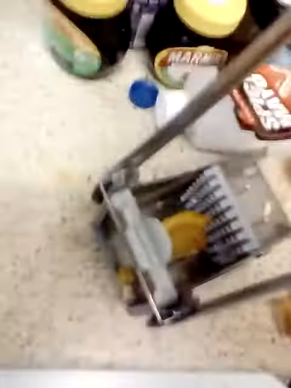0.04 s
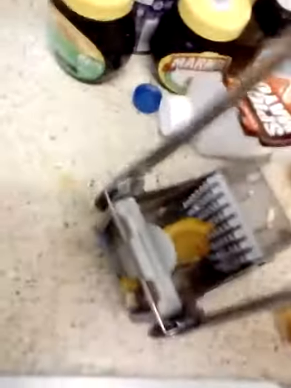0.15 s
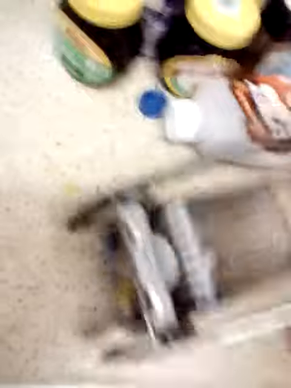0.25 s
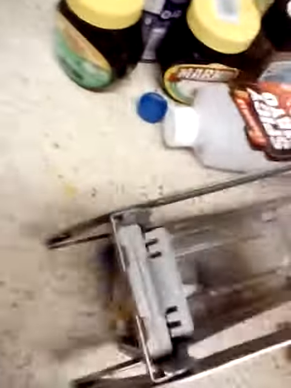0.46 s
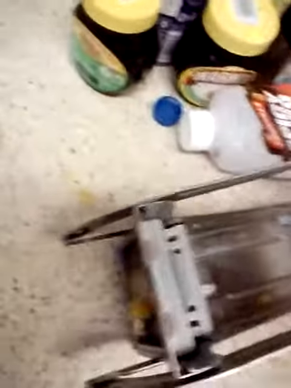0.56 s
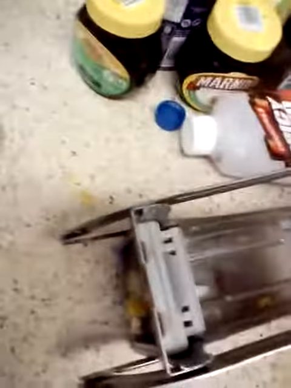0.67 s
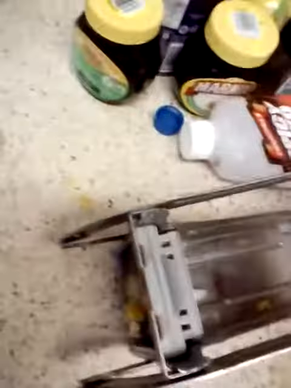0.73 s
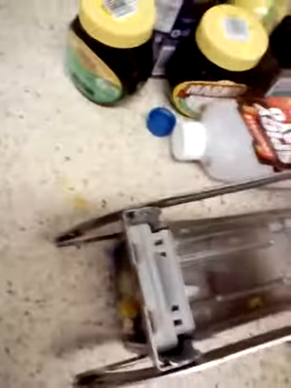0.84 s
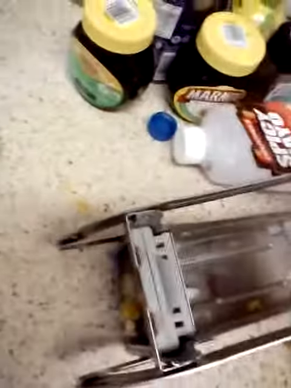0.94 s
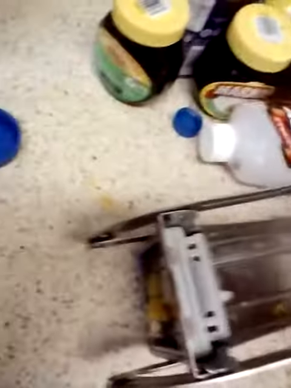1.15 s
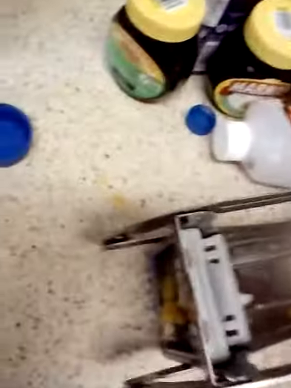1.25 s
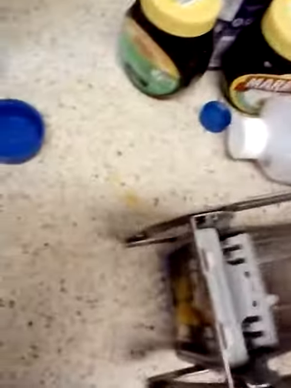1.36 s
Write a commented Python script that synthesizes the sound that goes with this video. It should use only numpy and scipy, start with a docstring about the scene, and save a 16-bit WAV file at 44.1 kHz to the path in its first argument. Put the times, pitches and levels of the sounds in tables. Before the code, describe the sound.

A lever vegetable chopper crunches through a vegetable and shuts with a sharp plastic clack.

```python
"""A lever vegetable chopper is pressed shut on a counter, close up, in a small kitchen with faint hiss.
At 0.23 s the pusher knocks the vegetable and crunches it through the blade grid; wet pulp fizzes.
The plastic parts clack, loudest at 0.42 s, and the base thumps the counter. The lever ticks lightly.
From 1.2 s the grip shifts with a faint rumble and the pusher starts to scrape back."""
import sys
import numpy as np
from scipy import signal
from scipy.fft import rfft, irfft, next_fast_len
from scipy.io import wavfile
from scipy.ndimage import map_coordinates

SR = 44100
rng = np.random.default_rng(int(sys.argv[2]) if len(sys.argv) > 2 else 0)


def output_pcm(signal):
    """Save a mono or channel-first signal as 16-bit PCM at the path in sys.argv[1].

    Samples are clipped to [-1, 1] before scaling.
    """
    pcm = np.clip(np.atleast_2d(signal).T, -1, 1) * 32767
    wavfile.write(sys.argv[1], SR, np.round(pcm).astype(np.int16))


N = 61739

# modes of the plastic body: (frequency [Hz], level [dB], t60 [s])
PLASTIC_MODES = [(760, -13, 0.064), (1202, -12.5, 0.026), (1437, -11.5, 0.046), (1499, -5, 0.02),
                 (1650, -13.5, 0.02), (2034, -11, 0.026), (2598, -7.5, 0.086), (2895, -8, 0.0344),
                 (3132, -10, 0.024), (3564, -3, 0.026), (3890, -15.5, 0.013), (5680, -13.5, 0.013)]


def amp(db):
    """Decibels to gain."""
    return 10 ** (np.asarray(db) / 20)


def unit_rms(x):
    """Scale to rms 1."""
    return x / np.sqrt(np.mean(x ** 2) + 1e-20)


def interp_log(points, hz):
    """Read (frequency [Hz], value) points on a log axis."""
    point_hz, values = np.transpose(points)
    return np.interp(np.log(hz + 1), np.log(point_hz + 1), values)


def envelope(points):
    """Gain per sample from (time [s], level [dB]); silent before the first point, last one held."""
    time_s, db = np.transpose(points)
    return amp(np.interp(np.arange(N) / SR, time_s, db, left=-120, right=db[-1]))


def colour(x, spectrum, tilt_db_oct=0, size=4096):
    """Minimum-phase filter of unit energy with the given spectrum and tilt."""
    hz = np.fft.rfftfreq(size, 1 / SR)
    gain_db = interp_log(spectrum, hz) + tilt_db_oct * np.log2(np.clip(hz, 300, 8000))
    cepstrum = irfft(np.log(amp(gain_db)))
    half = size // 2
    causal = np.r_[cepstrum[0], 2 * cepstrum[1:half], np.zeros(half)]
    kernel = irfft(np.exp(rfft(causal)))
    return signal.fftconvolve(x, kernel / np.linalg.norm(kernel))[:len(x)]


def add(track, start_s, x):
    """Mix x into the track."""
    part = track[max(round(start_s * SR), 0):][:len(x)]
    part += x[:len(part)]


def ring(modes, scatter_db, detune, tilt_db_oct=0, pivot_hz=2200):
    """Damped modes; level and pitch vary a little per blow."""
    t = np.arange(SR // 2) / SR
    out = np.zeros(len(t))
    for k, (hz, db, t60_s) in enumerate(modes):
        start_db = db + tilt_db_oct * np.log2(hz / pivot_hz) + scatter_db * rng.standard_normal()
        detuned_hz = hz * (1 + detune * rng.standard_normal())
        out += (-1) ** k * amp(start_db - 60 * t / t60_s) * np.sin(2 * np.pi * detuned_hz * t)
    return out


def grains(per_s, spread_db, smooth_db):
    """Tiny breaks or slips of uneven size over smooth rubbing noise."""
    hits = rng.random(N) < per_s / SR
    sizes = amp(spread_db * np.minimum(rng.exponential(size=N), 3))
    impulses = unit_rms(hits * sizes * rng.choice([-1, 1], N))
    return unit_rms(impulses + amp(smooth_db) * rng.standard_normal(N))


def through_body(x, body_db=-19.5):
    """Rubbing and breaking keep the plastic's modes ringing."""
    response = ring(PLASTIC_MODES, scatter_db=0.5, detune=0.001)
    return x + amp(body_db) * signal.fftconvolve(x, response / np.linalg.norm(response))[:N]


def kitchen(x, tail_db=-10.5, early_db=-10, early_t60_s=0.049, rise_s=0.0033):
    """Direct sound, early echoes off counter and jars, and the room's tail."""
    # reverberation: (frequency [Hz], t60 [s])
    decay_times = [(70, 0.393), (250, 0.51), (700, 0.46), (2000, 0.32), (5000, 0.22), (12000, 0.3)]
    hz, frame_s, noise = signal.stft(rng.standard_normal(SR * 2 // 3), SR, nperseg=256)
    decay = amp(-60 * frame_s / interp_log(decay_times, hz)[:, None])
    tail = signal.istft(noise * decay, SR, nperseg=256)[1]
    t = np.arange(len(tail)) / SR
    rise = 1 - np.exp(-(t / rise_s) ** 2)
    tail *= rise
    early = rng.standard_normal(len(t)) * rise * amp(-60 * t / early_t60_s)
    response = amp(tail_db) * tail / np.linalg.norm(tail) + amp(early_db) * early / np.linalg.norm(early)
    return x + signal.fftconvolve(x, response)[:len(x)]


def hiss(waver_db=0.7, waver_per_s=12, hum_hz=260, hum_db=-63):
    """Faint room noise and a low hum, both wavering slowly."""
    # room noise: (frequency [Hz], level [dB])
    spectrum = [(25, -24.5), (80, -13), (140, -3), (200, -7), (255, -4.5), (340, -8.5), (450, -18),
                (800, -25.5), (1300, -15.5), (2000, -8.5), (2700, -2.5), (4000, -7.5), (6300, -16.5),
                (8200, -38), (13500, -33.5), (16000, -31)]
    # room noise: (time [s], level [dB])
    levels = [(0, -50), (.12, -56), (.6, -52), (.85, -55.5), (1.0, -54.5), (1.12, -51.5), (1.23, -56),
              (1.4, -74)]
    t = np.arange(N) / SR
    waver = map_coordinates(rng.standard_normal(40), [t * waver_per_s], mode="mirror")
    drift_rad = map_coordinates(rng.standard_normal(40), [t * waver_per_s], mode="mirror")
    noise = unit_rms(colour(rng.standard_normal(2 * N), spectrum)[N:])
    hum = amp(hum_db) * np.sin(2 * np.pi * hum_hz * t + drift_rad)
    return envelope(levels) * amp(-waver_db * waver) * noise + hum


def handling():
    """The shifting grip makes the base rumble faintly."""
    # rumble: (time [s], level [dB])
    levels = [(1.12, -92), (1.21, -57.5), (1.26, -61), (1.33, -47), (1.4, -50.5)]
    # rumble: (frequency [Hz], level [dB])
    spectrum = [(25, -27.5), (90, -1), (140, 2), (300, -4.5), (420, -9.5), (700, -33.5), (3000, -47)]
    return envelope(levels) * unit_rms(colour(rng.standard_normal(N), spectrum))


def scrape():
    """The pusher sticks and slips along its channel."""
    # rubbing: (time [s], level [dB])
    levels = [(.58, -53.5), (.645, -49.5), (.69, -58.5), (.74, -62), (1.24, -65.5), (1.295, -49),
              (1.32, -33), (1.342, -34), (1.362, -40), (1.385, -34.5), (1.4, -34.5)]
    # rubbing: (frequency [Hz], level [dB])
    spectrum = [(60, -37), (150, -3.5), (400, -0.5), (700, -5.5), (1300, 7), (2000, 0.5), (3000, 5),
                (4500, -3), (6300, -11), (8000, -19.5), (14500, -32.5), (17000, -32.5)]
    slips = colour(grains(per_s=1200, spread_db=-1.5, smooth_db=-3), spectrum)
    return kitchen(through_body(envelope(levels) * slips))


def fizz():
    """Wet pulp crackles finely as it is squeezed past the plastic."""
    # crackle: (time [s], level [dB])
    levels = [(.19, -75), (.24, -43.5), (.30, -53), (.325, -78), (.365, -89), (.39, -51), (.412, -77),
              (.421, -32), (.434, -44.5), (.48, -61.5), (.495, -72.5), (.60, -78), (.645, -66.5),
              (.69, -67), (.73, -96), (1.29, -92.5), (1.318, -50), (1.4, -61)]
    # crackle: (frequency [Hz], level [dB])
    spectrum = [(1000, -36.5), (4000, -6.5), (6300, -11), (8000, -3), (11000, -10), (14000, -4),
                (16000, -4.5)]
    return envelope(levels) * colour(grains(per_s=2000, spread_db=6, smooth_db=-16.5), spectrum)


def contacts(hits, spectrum, crack_t60_s, spot_db, body_db):
    """Each contact: a short crack, a brief ring of the struck spot, the ring of the plastic body."""
    crack_db, spot_attack_s, spot_t60_s = -2.5, 0.00027, 0.014
    out, t = np.zeros(N), np.arange(SR // 2) / SR
    for time_s, db, tilt_db_oct, spot_hz in hits:
        burst = rng.standard_normal(len(t)) * amp(crack_db - 60 * t / crack_t60_s)
        crack = colour(burst, spectrum, tilt_db_oct)
        attack = 1 - np.exp(-t / spot_attack_s)
        spot = attack * amp(spot_db - 60 * t / spot_t60_s) * np.sin(2 * np.pi * spot_hz * t)
        body = amp(body_db) * ring(PLASTIC_MODES, scatter_db=3, detune=0.00084, tilt_db_oct=tilt_db_oct)
        add(out, time_s, kitchen(amp(db) * (crack + spot + body)))
    return out


def ticks():
    """The lever and its joints tick, barely ringing the body."""
    # light contacts: (time [s], level [dB], tilt [dB/octave], spot pitch [Hz])
    hits = [(.1965, -31.5, -0.5, 2183), (.372, -31.5, -6, 3120), (.402, -27.5, 6, 3660),
            (.509, -38, 3.5, 3020), (.5425, -27.5, -6, 2520), (.563, -35.5, 5.5, 3040),
            (.6265, -41.5, 12, 6600), (.6445, -32, 2.5, 6430), (.6595, -33, 3.5, 3030),
            (.7035, -33, 5, 3130), (.779, -44, 0, 3370), (.8365, -36.5, 3, 1760), (.9383, -36.5, 0.5, 3430),
            (1.188, -43, -2, 2640), (1.2495, -30.5, -5.5, 2450), (1.267, -37, 8, 2680),
            (1.297, -34.5, 14, 4000), (1.303, -31, 0, 1360), (1.3155, -22.5, 24.5, 2800),
            (1.327, -32.5, 5.5, 3100), (1.3365, -22.5, 10, 3940), (1.3435, -22.5, -4, 2750),
            (1.378, -29.5, -15, 1350)]
    # crack of a tick: (frequency [Hz], level [dB])
    spectrum = [(60, -39), (650, -48.5), (1000, -12.5), (1400, -4.5), (2800, 9), (4500, -1), (6300, -5.5),
                (8000, -26), (14500, -26), (17000, -10.5)]
    return contacts(hits, spectrum, crack_t60_s=0.025, spot_db=-1, body_db=-27)


def thumps(knock_db=2, knock_t60_s=0.044):
    """The base rings low on the counter, with a dull knock."""
    # blows on the counter: (time [s], level [dB], tilt [dB/octave])
    hits = [(0.2345, -24.5, 0.5), (0.371, -38.5, -6.5), (0.4187, -24.5, 4.5), (.432, -25.5, 2),
            (0.495, -34.5, 1), (0.6982, -30, -3.5), (0.7054, -31, -5), (.765, -44.5, -10)]
    # base on the counter: (frequency [Hz], level [dB], t60 [s])
    modes = [(89, 2.5, 0.085), (112.6, -2, 0.088), (140, -5, 0.25), (250, -3.5, 0.11), (294, -18.5, 0.32),
             (353.2, -12.5, 0.33), (382, -6.5, 0.22), (462.4, -8, 0.074)]
    # knock: (frequency [Hz], level [dB])
    spectrum = [(25, -31), (90, 6.5), (250, -4.5), (420, 0.5), (560, -9), (800, -13.5), (1050, -4.5),
                (1600, -3), (4000, -21), (12000, -47.5)]
    out, t = np.zeros(N), np.arange(SR // 2) / SR
    for time_s, db, tilt_db_oct in hits:
        burst = rng.standard_normal(len(t)) * amp(knock_db - 60 * t / knock_t60_s)
        knock = colour(burst, spectrum, tilt_db_oct)
        base = ring(modes, scatter_db=1.5, detune=0.0066, tilt_db_oct=tilt_db_oct, pivot_hz=180)
        add(out, time_s, kitchen(amp(db) * (base + knock), tail_db=-6))
    return out


def landing():
    """The pusher meets the vegetable with a hollow knock."""
    # pusher blows: (time [s], level [dB])
    hits = [(.2338, -12.5), (.2378, -23), (.2465, -25.5)]
    # loaded chamber: (frequency [Hz], level [dB], t60 [s])
    modes = [(397, -2, 0.025), (443, -6.5, 0.05), (724, 2, 0.021), (1018, -2, 0.023), (1230, -6, 0.013)]
    out = np.zeros(N)
    for time_s, db in hits:
        add(out, time_s, amp(db) * ring(modes, scatter_db=4.5, detune=0.0017))
    return kitchen(out)


def crunch():
    """The pusher crushes the vegetable, dull and full; the blades slice it with a brighter rasp."""
    # crushing: (time [s], level [dB])
    crush_levels = [(.16, -67), (.2, -44.5), (.222, -32.5), (.238, -20), (.262, -26), (.295, -27.5),
                    (.306, -36.5), (.35, -42.5), (.40, -40.5), (.416, -37.5), (.425, -18.5), (.445, -34),
                    (.482, -23), (.495, -59), (.56, -85.5)]
    # crushing: (frequency [Hz], level [dB])
    crush_spectrum = [(60, -6.5), (200, 3), (400, 11), (600, -4), (1000, -0.5), (1600, 8), (3000, 2),
                      (4200, -7.5), (6300, -9), (8000, -31), (14500, -27), (17000, -40)]
    # slicing: (time [s], level [dB])
    rasp_levels = [(.245, -42), (.262, -36.5), (.282, -29.5), (.296, -32), (.304, -50.5), (.33, -53.5),
                   (.455, -50.5), (.470, -48.5), (.484, -29.5), (.492, -66.5), (.53, -78)]
    # slicing: (frequency [Hz], level [dB])
    rasp_spectrum = [(200, -24), (1200, -29), (2100, -4.5), (2700, 5.5), (3400, -4.5), (4200, -13.5),
                     (6300, -11.5), (8000, -30.5), (15000, -32)]
    crush = envelope(crush_levels) * colour(grains(per_s=1200, spread_db=4.5, smooth_db=-2), crush_spectrum)
    rasp = envelope(rasp_levels) * colour(grains(per_s=1600, spread_db=6, smooth_db=0), rasp_spectrum)
    return kitchen(through_body(crush) + rasp)


def clacks():
    """The plastic parts strike each other and ring the body."""
    # hard contacts: (time [s], level [dB], tilt [dB/octave], spot pitch [Hz])
    hits = [(.2342, -15.5, 1.5, 750), (.2375, -25, -15, 1440), (.2410, -45, -15, 1170),
            (.2482, -21, -9, 420), (.2565, -13, -1, 1640), (.2712, -21, -5.5, 1700), (.2795, -23, -3, 2850),
            (.285, -22, 4.5, 2480), (.2928, -18, -1.5, 2800), (.4142, -18.5, -2, 3660),
            (.4178, 0.5, -1.5, 1568), (.4188, -5, -0.5, 3156), (.4222, -18, -0.5, 3360),
            (.4245, -23, -4, 1900), (.4298, -13.5, -7, 1476), (.4332, -30, -9.5, 1190),
            (.4615, -47, -1, 1800), (.4700, -18.5, -1, 1850), (.4722, -20, -6, 1250),
            (.4802, -18, -1.5, 2600)]
    # crack of a clack: (frequency [Hz], level [dB])
    spectrum = [(60, -26), (250, -8), (600, -7.5), (760, -5), (1000, -2), (1550, 0.5), (2000, 0),
                (2250, -2.5), (3050, 2), (3700, -1), (4500, -4), (6300, -10), (8000, -24.5), (14500, -33),
                (17000, -46.5)]
    return contacts(hits, spectrum, crack_t60_s=0.014, spot_db=-1.5, body_db=-8.5)


def scene():
    """The chopper in the kitchen, mono."""
    impacts = clacks() + ticks() + thumps() + landing()
    return (impacts + crunch() + fizz() + scrape() + handling() + hiss())[None]


def record(dry, low_cut_hz=62, top_hz=15750):
    """The small microphone loses deep bass, clips the loudest clack and limits the band."""
    thin = signal.sosfilt(signal.butter(2, low_cut_hz, "high", fs=SR, output="sos"), dry)
    clipped = np.clip(thin, -1, 1)
    size = next_fast_len(N + SR // 2)
    passband = np.fft.rfftfreq(size, 1 / SR) < top_hz
    return irfft(rfft(clipped, size) * passband, size)[:, :N]


dry = scene()
out = record(dry)
output_pcm(out)
```